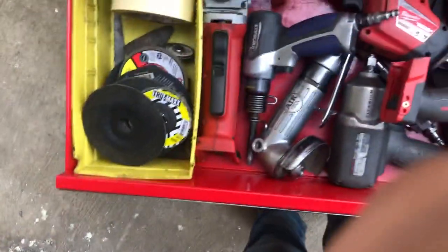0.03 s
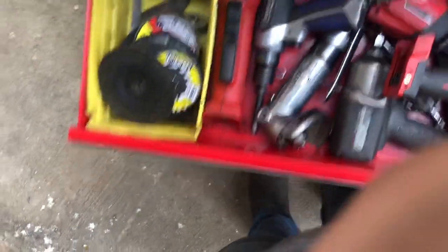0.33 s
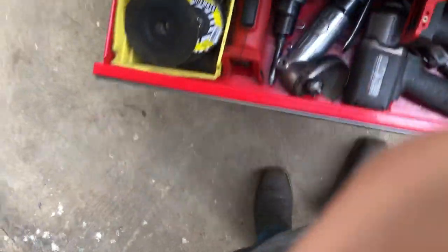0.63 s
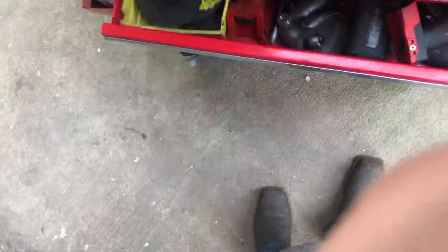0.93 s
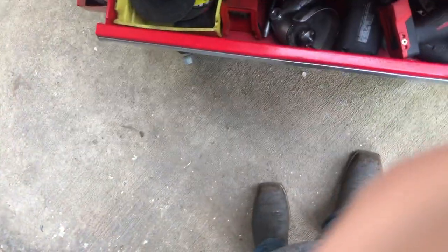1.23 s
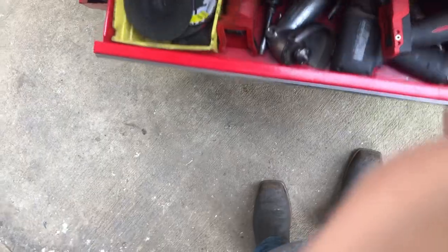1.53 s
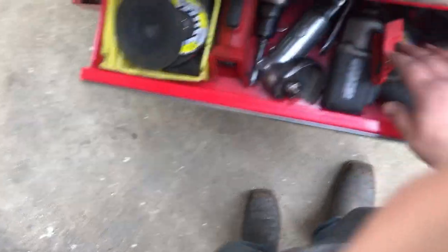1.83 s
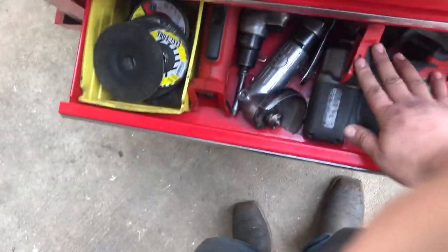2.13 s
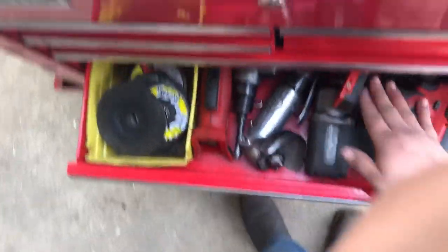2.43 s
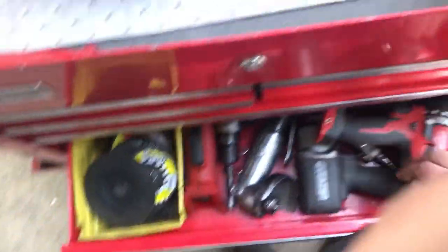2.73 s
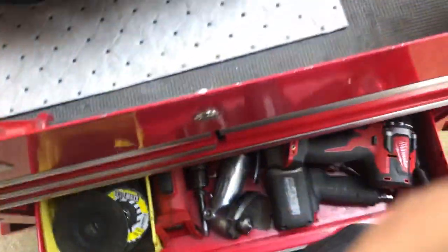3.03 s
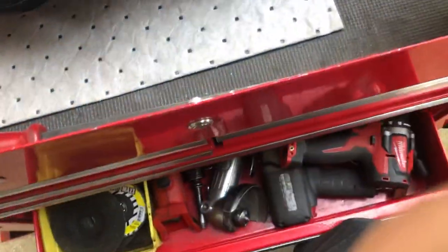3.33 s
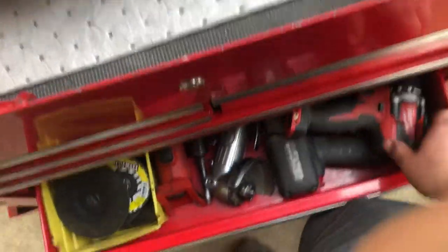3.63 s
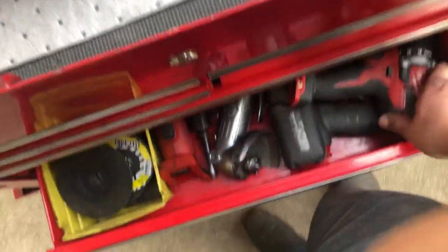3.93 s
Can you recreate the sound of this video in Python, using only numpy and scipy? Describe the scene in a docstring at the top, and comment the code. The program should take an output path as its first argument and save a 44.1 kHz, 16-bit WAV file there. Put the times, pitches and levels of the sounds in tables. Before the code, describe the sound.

Close up, a metal tool drawer clatters as it is pushed in, loose tools jangling inside. It rolls back out with smaller knocks and ticks, then clunks loudly, over a steady workshop machine hum.

```python
"""A machine hums steadily in a workshop, over a bed of air noise.
A steel drawer full of air tools is pushed shut, pulled open again and bumps against its stop.
Its runners hiss faintly with tiny rolling contacts, and there are soft scuffs of rubbing.
Each knock rings the sheet metal, which clacks and booms, and shakes the loose tools into a jangle.
One tool clinks against another and small parts tick."""
import sys
import numpy as np
from scipy import signal
from scipy.io import wavfile

SR = 44100
rng = np.random.default_rng(int(sys.argv[2]) if len(sys.argv) > 2 else 0)


def store_pcm(level_fs):
    """Save levels as 16-bit WAV."""
    pcm = np.round(np.clip(level_fs, -1, 1) * 32767).astype(np.int16)
    wavfile.write(sys.argv[1], SR, np.atleast_2d(pcm).T)


N = 176400
TIME_S = np.arange(N) / SR
EDGES_HZ = np.geomspace(22, 17000, 27)
CENTRES_HZ = np.sqrt(EDGES_HZ[1:] * EDGES_HZ[:-1])


def from_db(db):
    """Decibels to gain."""
    return 10 ** (np.asarray(db) / 20)


def unit_rms(x):
    """Scale to rms one."""
    return x / np.sqrt(np.mean(x ** 2) + 1e-20)


def white():
    """White noise, rms one."""
    return rng.standard_normal(N)


def grains(per_s):
    """Random tiny contacts, rms one."""
    return unit_rms((rng.random(N) < per_s / SR) * white())


def drift(rate_hz):
    """Slow random wander, rms one."""
    step, settle = 40, 2000
    pole = np.exp(-2 * np.pi * rate_hz * step / SR)
    noise = rng.standard_normal(N // step + settle + 2)
    slow = signal.lfilter([1], [1, -2 * pole, pole * pole], noise)[settle:]
    return np.interp(np.arange(N) / step, np.arange(len(slow)), unit_rms(slow))


def clicks(start_s, gain):
    """One-sample impulses."""
    return np.bincount((np.asarray(start_s) * SR).astype(int), gain, N)[:N] + 1e-18


def decay_per_sample(t60_s):
    """Share of a vibration left after one sample."""
    return np.exp(-np.log(1000) / (t60_s * SR))


def ring(hits, pitch_hz, t60_s):
    """One mode: a unit click starts a decaying sine of height one."""
    radius = decay_per_sample(t60_s)
    angle = 2 * np.pi * min(pitch_hz, SR / 2) / SR
    return signal.lfilter([0, np.sin(angle)], [1, -2 * radius * np.cos(angle), radius ** 2], hits)


def envelope(hits, t60_s):
    """Amplitude of hits whose energies add and decay."""
    return np.sqrt(signal.lfilter([1], [1, -decay_per_sample(t60_s) ** 2], hits ** 2))


def band(x, edges_hz):
    """Band-pass, scaled to rms one."""
    return unit_rms(signal.sosfilt(signal.butter(2, edges_hz, "band", fs=SR, output="sos"), x))


def bands(source):
    """Unit-rms bands, cut alternately from two independent draws of a source."""
    pair = source(), source()
    return [band(pair[k % 2], EDGES_HZ[k:k + 2]) for k in range(len(CENTRES_HZ))]


def band_gains(spectrum):
    """Band gains of unit total power, rolling off below the spectrum's first point."""
    freq_hz, level_db = np.transpose(spectrum)
    density = from_db(np.interp(np.log(CENTRES_HZ), np.log(freq_hz), level_db))
    rolloff = np.minimum(CENTRES_HZ / freq_hz[0], 1) ** 2
    gain = density * np.sqrt(CENTRES_HZ) * rolloff
    return gain / np.linalg.norm(gain)


def friction(spectrum, grains_per_s):
    """Tiny contacts shaped to a spectrum."""
    grain_bands = bands(lambda: grains(grains_per_s))
    return sum(gain * noise for gain, noise in zip(band_gains(spectrum), grain_bands))


# Motor tones: pitch_hz, rms_db, waver_depth
MOTOR_TONES = [(58.3, -53.5, 0.7), (116.3, -42, 1), (175.6, -39, 0), (238.7, -46, 0), (349.8, -50, 0.57),
               (410.5, -52, 0.92), (1095, -67, 0.8)]


def machine_hum(drone_hz=206.2, drone_db=-28.5, drone_waver=0.033):
    """A strong drone and weaker motor tones, most wavering in level and phase."""
    out = 0
    for pitch_hz, rms_db, waver_depth in [(drone_hz, drone_db, drone_waver)] + MOTOR_TONES:
        waver = 1 + waver_depth * (drift(1.2) + 1j * drift(3.2))
        tone = np.exp(2j * np.pi * (pitch_hz * TIME_S + rng.random()))
        out = out + from_db(rms_db) * unit_rms((waver * tone).real)
    return out


# Workshop air spectrum: freq_hz, relative_db
AIR_SPECTRUM = [(25, -20), (40, -25), (60, 0), (100, 2.5), (190, 2), (280, -4.5), (380, -6), (500, -11),
                (700, -19.5), (1300, -21.5), (2000, -26.5), (4500, -30.5), (7000, -37), (11000, -45.5),
                (16000, -54)]


def room_air(level_db=-35.5, flicker_db=1.82):
    """Low air noise, each band flickering on its own."""
    return sum(gain * noise * from_db(level_db + flicker_db * drift(15))
               for gain, noise in zip(band_gains(AIR_SPECTRUM), bands(white)))


# Runner loudness curve: time_s, level_db
RUNNER_LEVELS = [(0, -73), (.3, -53), (.6, -53), (.72, -62), (.85, -49), (.92, -42), (1.06, -44),
                 (1.2, -58), (1.8, -54), (1.95, -53), (2.12, -49), (2.36, -47), (2.5, -59), (2.8, -56),
                 (3.0, -45.5), (3.4, -48.5), (3.6, -55), (4, -71)]
# Runner spectrum: freq_hz, relative_db
RUNNER_SPECTRUM = [(200, 4), (500, -3.5), (800, -9.5), (1300, -5.5), (3000, -9), (6000, -19), (16000, -43)]


def runners():
    """Rolling contacts hiss as the drawer slides."""
    level_db = np.interp(TIME_S, *np.transpose(RUNNER_LEVELS))
    return from_db(level_db) * friction(RUNNER_SPECTRUM, grains_per_s=1500)


# Swells of rubbing: centre_s, sigma_s, level_db
SCUFF_SWELLS = [(.45, 0.1, -68), (1.54, 0.067, -60), (1.915, 0.027, -49), (2.245, 0.027, -53),
                (2.38, 0.021, -50), (2.875, 0.018, -49.5)]
# Rubbing spectrum: freq_hz, relative_db
SCUFF_SPECTRUM = [(1000, 3), (4000, 5.5), (8000, -1.5), (12000, -7.5), (16000, -18)]


def scuffs(flicker_db=1.5):
    """Brief, uneven swells of rubbing."""
    swell = sum(from_db(level_db) * np.exp(-.5 * ((TIME_S - centre_s) / sigma_s) ** 2)
                for centre_s, sigma_s, level_db in SCUFF_SWELLS)
    flicker = from_db(flicker_db * drift(60))
    return swell * flicker * friction(SCUFF_SPECTRUM, grains_per_s=2500)


CLACK_PIVOT_HZ = 1480
# Spectrum of the crowded steel modes: freq_hz, relative_db
CLACK_SPECTRUM = [(300, -13.5), (550, 2), (720, -1), (950, 1.5), (1200, 5.5), (1700, -5), (2700, -4),
                  (3700, -8), (5200, -9.5), (7000, -19.5), (11000, -22.5), (16000, -37)]
# Knocks of drawer and load: start_s, clack_db, tilt_db_per_octave, body_db, spot_hz
DRAWER_KNOCKS = [(.646, -17, 0, -23, 520), (0.683, -23, 2, -22.5, 300), (.690, -27, 5, -16, 960),
                 (.698, -27, 0, -20, 467), (.734, -28.5, 1.5, -22, 400), (0.743, -20.5, 0, -15.5, 533),
                 (.749, -28, -2, -18.5, 306), (.774, -21, -1, -21.5, 470), (0.781, -25, 0.5, -18, 200),
                 (.792, -23, -2, -21, 272), (.801, -26.5, 1.5, -17, 292), (0.813, -23.5, 0.5, -24, 490),
                 (.836, -28.5, -0.5, -20.5, 480), (0.9313, -16.5, -3.5, -27, 330),
                 (0.944, -27.5, 4, -18, 328), (0.958, -20, -1.5, -20.5, 425), (.978, -29, 1, -15, 167),
                 (.999, -27, 0, -25, 456), (1.009, -38, 2, -35, 420), (1.029, -35, 0.5, -36, 300),
                 (1.059, -35, -3, -33.5, 440), (1.129, -41.5, 0, -42, 450), (1.556, -32, -2, -46, 480),
                 (1.9, -31, -2.5, -35, 480), (1.906, -42, -2, -26, 490), (1.946, -29.5, -.5, -40, 480),
                 (2.037, -37, -0.5, -46, 520), (2.045, -29, -4.5, -31, 540), (2.049, -35, -8, -17, 527),
                 (2.063, -32.5, -2, -34, 533), (2.077, -34.5, 1.5, -50, 560), (2.116, -40, 2, -40, 500),
                 (2.124, -41, -16, -33, 577), (2.196, -28, -3.5, -33, 380), (2.202, -31.5, -9.5, -22, 296),
                 (2.233, -37, 1, -33, 170), (2.279, -34.5, 1.5, -29, 400), (2.297, -32.5, 2, -29.5, 400),
                 (2.930, -28, -3.5, -24, 374), (2.940, -33, -1.5, -28, 474), (2.971, -29.5, -5.5, -26, 384),
                 (2.986, -39, -11, -22.5, 287), (3.095, -20.5, -1, -19.5, 400), (3.103, -16, 2, -21, 576),
                 (3.111, -18.5, -2.5, -13.5, 165), (3.122, -25.5, -9, -19.5, 430),
                 (3.150, -32, 3, -24.5, 474), (3.199, -45, -4, -39, 201), (3.463, -34.5, -1.5, -46, 500),
                 (3.492, -31, -5.5, -25, 410), (3.518, -51, -20, -31.5, 600)]


def clacks(attack_s=0.00056, pivot_t60_s=0.052, tail_pivot_t60_s=0.32, tail_db=-14, chatter_db=-9.5):
    """Knocks chatter into crowded steel modes, highs dying first; cabinet and room ring on."""
    start_s, clack_db, tilt_db_per_octave, _, _ = np.transpose(DRAWER_KNOCKS)
    chatter_bands = bands(lambda: white() + from_db(chatter_db) * grains(per_s=500))
    gains = band_gains(CLACK_SPECTRUM)
    rise = np.exp(-1 / (attack_s * SR))
    out = 0
    for centre_hz, gain, chatter, tail_noise in zip(CENTRES_HZ, gains, chatter_bands, bands(white)):
        ratio = max(centre_hz / CLACK_PIVOT_HZ, .2)
        hits = clicks(start_s, gain * from_db(clack_db + tilt_db_per_octave * np.log2(ratio)))
        decay = envelope(hits, pivot_t60_s / ratio ** 0.25)
        strike = signal.lfilter([1 - rise], [1, -rise], decay)
        tail = from_db(tail_db) * envelope(hits, tail_pivot_t60_s / ratio ** 0.27)
        out = out + chatter * strike + tail_noise * tail
    return out


def struck(modes, start_s, level_db, spot_hz, fade_db_per_octave, spread_db=1.5, scatter_s=.0006):
    """Blows ring a set of modes, favouring those near the struck spot's pitch."""
    out = 0
    for pitch_hz, relative_db, t60_s in modes:
        fade_db = fade_db_per_octave * np.abs(np.log2(pitch_hz / spot_hz))
        strength_db = level_db + relative_db - fade_db + spread_db * rng.standard_normal(len(start_s))
        lag_s = 0.76 / pitch_hz + scatter_s * rng.exponential(1, len(start_s))  # lows start later
        out = out + ring(clicks(start_s + lag_s, from_db(strength_db)), pitch_hz, t60_s)
    return out


# Drawer floor and side modes: pitch_hz, relative_db, t60_s
PANEL_MODES = [(109, -2, 0.17), (161, 1.5, 0.09), (176.6, 0.5, 0.14), (245, -1.5, 0.098), (272, 0, 0.19),
               (300.6, -2, 0.16), (381.4, -4, 0.11), (410.3, -2.5, 0.17), (465.3, -3.5, 0.11),
               (513.3, -1, 0.12), (559, -5.5, 0.19), (644, -9, 0.23), (681, -15, 0.12), (822.5, -7.5, 0.19),
               (863, -11.5, 0.18), (955, -8.5, 0.12)]
# Rail and tool modes: pitch_hz, relative_db, t60_s
RAIL_MODES = [(1094, -21, .2), (1165, -12, 0.096), (1295, -28, 0.23), (1405, -29, 0.29), (1846, -17, 0.12),
              (2415, -25, 0.19), (2470, -24, 0.12), (2976, -24.5, 0.15), (2940, -21, 0.18),
              (3760, -32, 0.32), (4940, -26, 0.41), (5490, -52, 0.59)]


def sheet_metal(low_cut_hz=118):
    """Knocks ring the panels and, higher up, rails and tools; the deepest bass is cut away."""
    start_s, clack_db, _, body_db, spot_hz = np.transpose(DRAWER_KNOCKS)
    panels = struck(PANEL_MODES, start_s, body_db, spot_hz, fade_db_per_octave=15.5)
    rails = struck(RAIL_MODES, start_s, clack_db, CLACK_PIVOT_HZ, fade_db_per_octave=4.5)
    return signal.sosfilt(signal.butter(4, low_cut_hz, "high", fs=SR, output="sos"), panels + rails)


def jangle(low_hz=2191, high_hz=11440, count=36, relative_db=-28.5, slope_db_per_octave=-5, spread_db=3):
    """Each knock shakes the loose tools: scattered high modes, a different few standing out each time."""
    start_s, clack_db, tilt_db_per_octave, _, _ = np.transpose(DRAWER_KNOCKS)
    out = 0
    for pitch_hz in np.geomspace(low_hz, high_hz, count) * rng.uniform(1.0, 1.02, count):
        mode_db = relative_db + slope_db_per_octave * np.log2(pitch_hz / low_hz)
        knock_db = clack_db + tilt_db_per_octave * np.log2(pitch_hz / CLACK_PIVOT_HZ)
        strength = from_db(mode_db + knock_db + spread_db * rng.uniform(-1, 1, len(start_s)))
        polarity = rng.choice([-1, 1], len(start_s))
        out = out + ring(clicks(start_s, strength * polarity), pitch_hz, t60_s=0.097)
    return out


# Solid steel tool modes: pitch_hz, level_db, t60_s
TOOL_MODES = [(4652, -22.5, 0.07), (7700, -32, 0.05), (8600, -33, 0.054), (8700, -37, 0.063),
              (9100, -30, 0.041), (10080, -36, 0.043), (10230, -27, 0.036), (12900, -24, 0.036),
              (12890, -43, 0.063)]


def clink(start_s=.792, snap_db=-23):
    """One steel tool strikes another: a noisy snap and a bright ring."""
    ringing = sum((-1) ** k * ring(clicks([start_s], [from_db(level_db)]), pitch_hz, t60_s)
                  for k, (pitch_hz, level_db, t60_s) in enumerate(TOOL_MODES))
    snap = envelope(clicks([start_s], [from_db(snap_db)]), t60_s=0.022)
    return ringing + snap * band(white(), edges_hz=[4000, 11000])


# Ticks of small parts: start_s, level_db, pitch_hz, t60_s
PART_TICKS = [(1.703, -43.5, 9500, 0.011), (1.869, -35, 5240, .02), (1.946, -32, 2750, 0.076),
              (1.946, -31.5, 2370, 0.054), (2.023, -36, 5400, 0.026), (2.021, -33, 2860, 0.022),
              (2.044, -28, 1774, 0.077), (2.077, -39, 6950, 0.04), (2.152, -43.5, 4600, .05),
              (2.208, -50, 11100, 0.034), (2.279, -37.5, 4900, 0.063), (2.954, -44, 5700, 0.023),
              (3.0143, -34, 4870, 0.032), (3.0148, -36, 3200, 0.022), (3.075, -39, 5320, 0.065),
              (3.137, -42, 7650, .04), (3.150, -43, 11500, .025), (3.374, -44, 2570, .25),
              (3.616, -47.5, 11200, .025)]


def ticks(grit_db=-3, edge_ratio=1.23):
    """Small parts touch: a short ring with contact grit around its pitch."""
    contact = white()
    out = 0
    for start_s, level_db, pitch_hz, t60_s in PART_TICKS:
        hit = clicks([start_s], [from_db(level_db)])
        edges_hz = [pitch_hz / edge_ratio, min(pitch_hz * edge_ratio, .45 * SR)]
        grit = band(contact, edges_hz) * envelope(hit, t60_s=0.023)
        out = out + ring(hit, pitch_hz, t60_s) + from_db(grit_db) * grit
    return out


def scene():
    """Workshop, drawer and tools in one channel."""
    workshop = machine_hum() + room_air()
    drawer = runners() + scuffs() + clacks() + sheet_metal()
    tools = jangle() + clink() + ticks()
    return (workshop + drawer + tools)[None]


def record(dry):
    """A steep low-pass cuts the top of the treble."""
    cutoff_hz = 15900
    return signal.sosfilt(signal.ellip(10, .1, 80, cutoff_hz, fs=SR, output="sos"), dry)


dry = scene()
out = record(dry)
store_pcm(out)
```